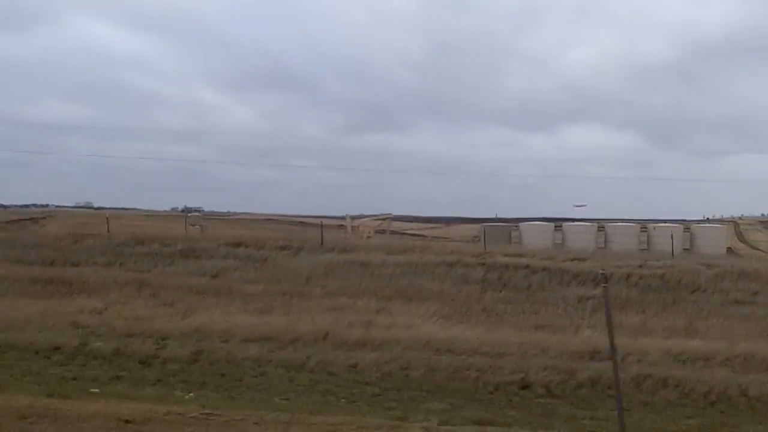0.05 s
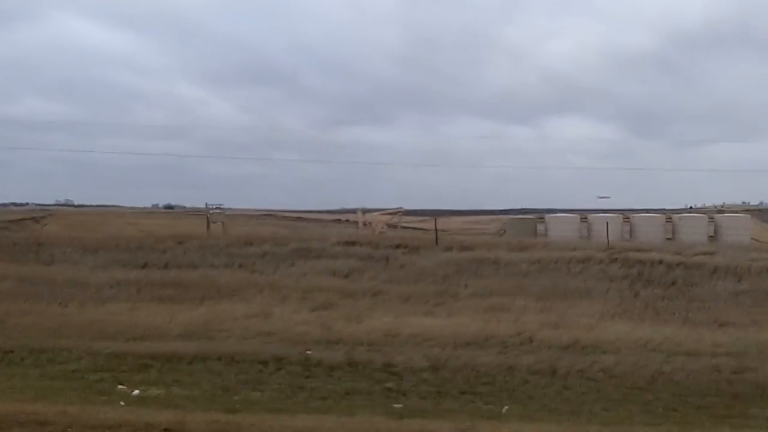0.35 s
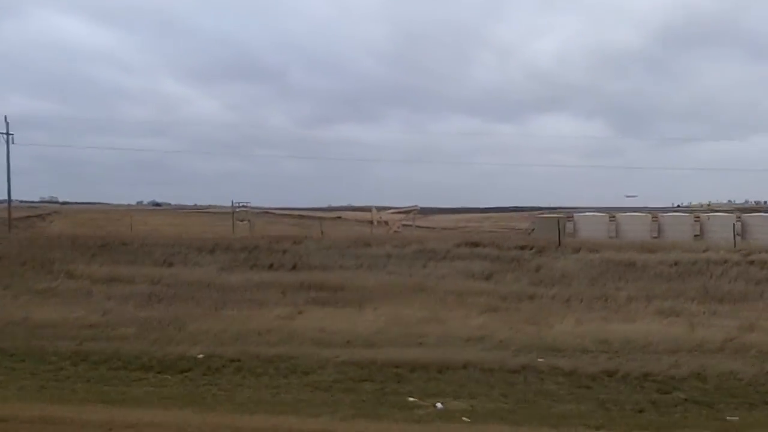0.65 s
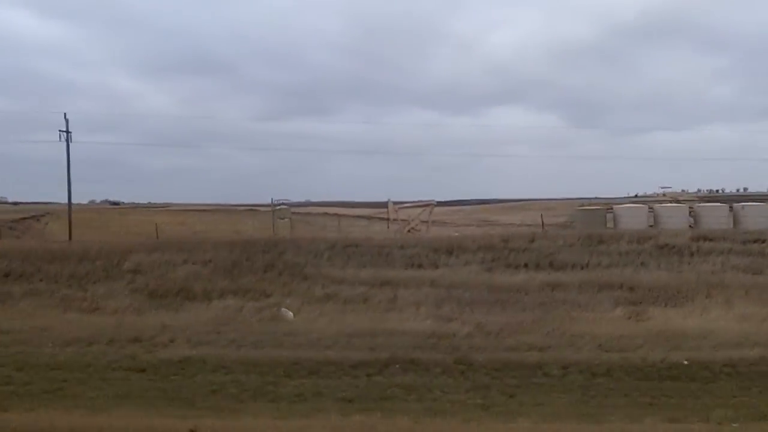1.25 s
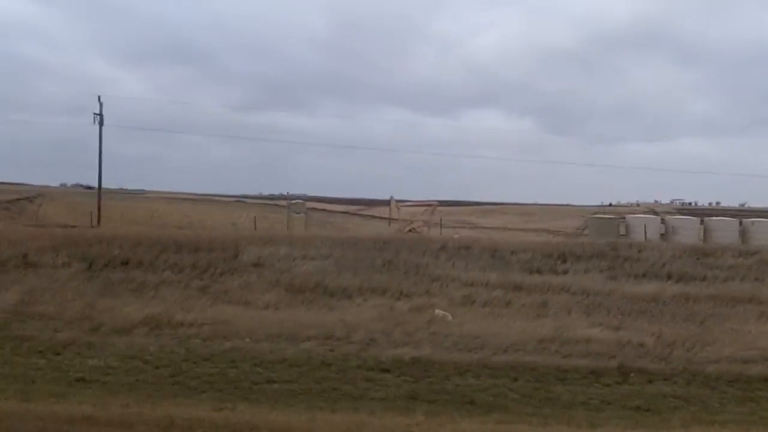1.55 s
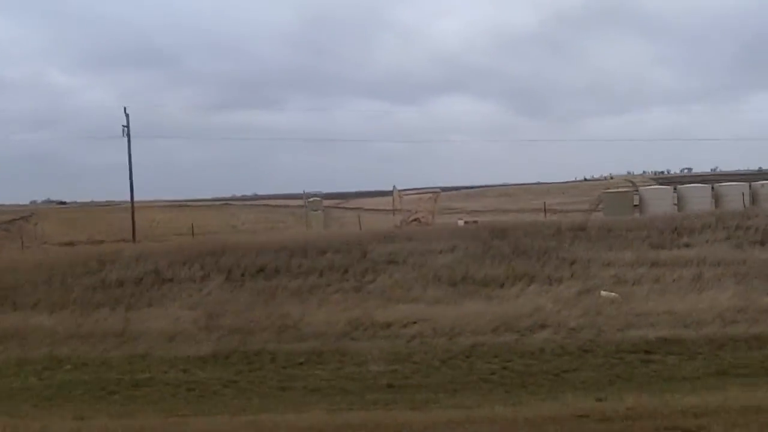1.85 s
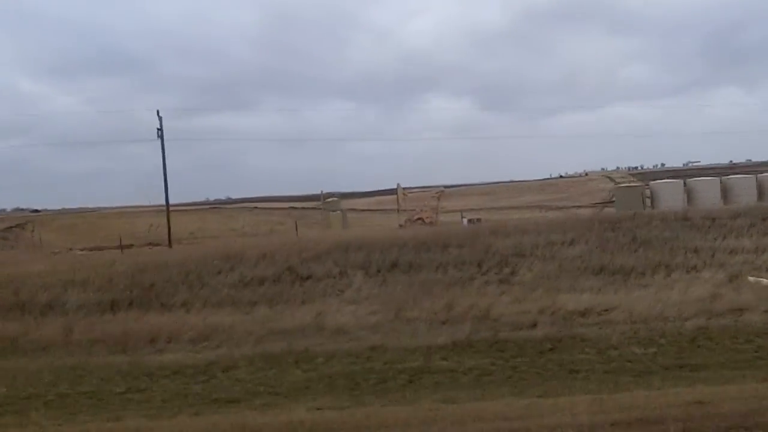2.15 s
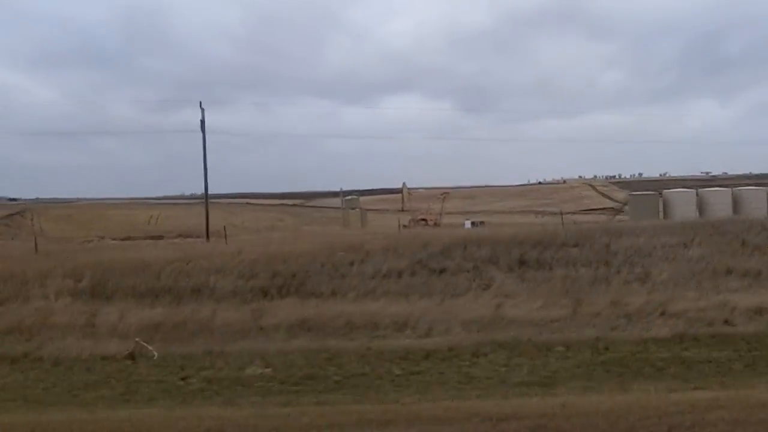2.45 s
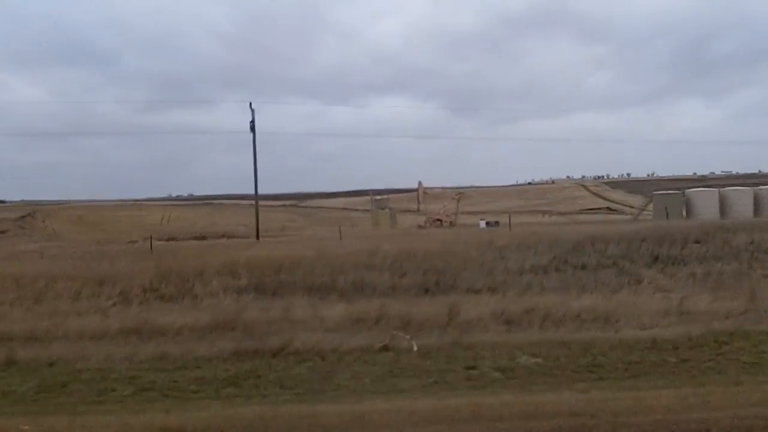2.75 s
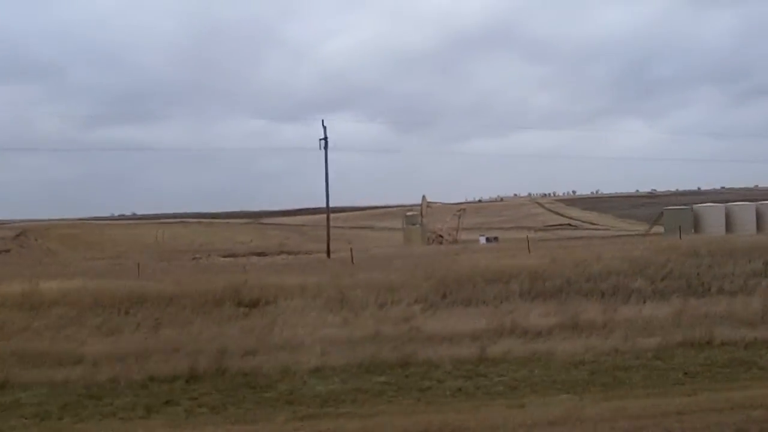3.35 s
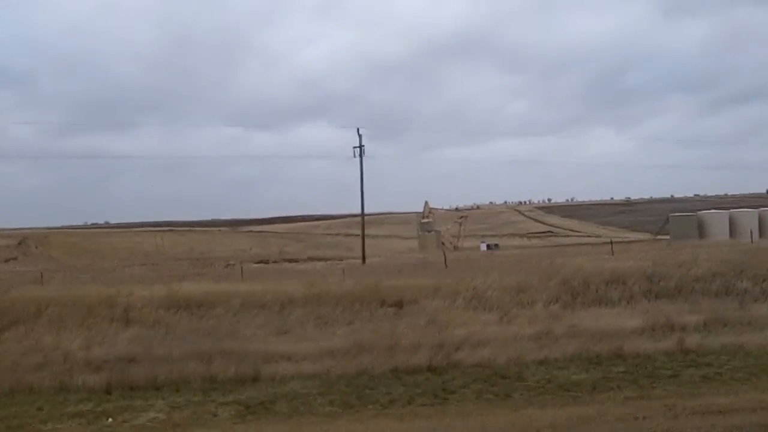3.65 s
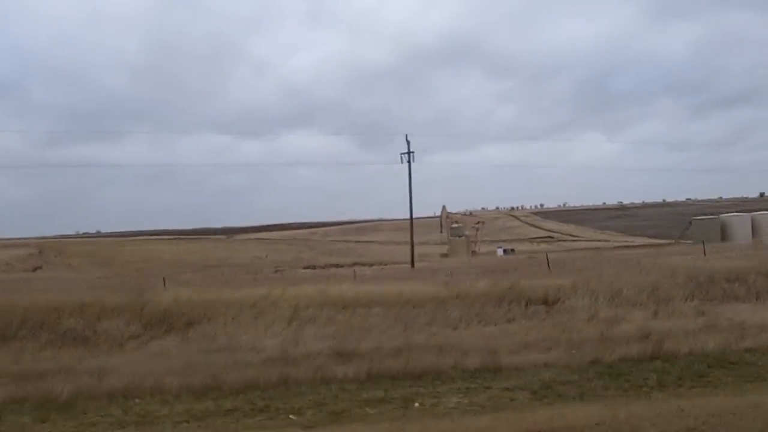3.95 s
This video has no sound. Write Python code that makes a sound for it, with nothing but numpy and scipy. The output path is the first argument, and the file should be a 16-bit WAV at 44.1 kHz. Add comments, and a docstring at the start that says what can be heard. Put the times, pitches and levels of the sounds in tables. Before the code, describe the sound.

Wind rushes and hisses in gusts on the microphone of a moving vehicle for all four seconds, over road rumble and a low engine drone. Irregular deep thumps with faint crackles hit from about 0.6 seconds, hardest just after 2 seconds, briefly ducking the sound. The hiss brightens between 1.6 and 1.9 seconds. A faint, shaky whistle comes and goes around 2.8 to 3.1 seconds.

```python
"""Open grassland, passed in a vehicle at steady speed, with wind on the microphone. The rushing air roars and
hisses in gusts and hits the microphone with low thumps; brief buzzing splutters flare around the hardest ones.
Underneath, the road rumbles and the engine drones; air briefly whistles over an edge. An automatic volume
control turns the sound down after the loudest peaks."""
import sys
import numpy as np
from scipy import signal
from scipy.fft import irfft
from scipy.io import wavfile
from scipy.ndimage import uniform_filter1d

SR = 44100
rng = np.random.default_rng(int(sys.argv[2]) if len(sys.argv) > 2 else 0)


def bounce(signal):
    """Save signal as a 16-bit WAV file at the path given by the first command-line argument."""
    frames = np.transpose(np.atleast_2d(signal))
    limited = np.clip(frames, -1, 1)
    pcm = np.round(limited * 32767).astype(np.int16)
    wavfile.write(sys.argv[1], SR, pcm)


N = 176400
TIME = np.arange(N) / SR
VOLUME_STEPS_PER_S, TREBLE_LIMIT_HZ = 750, 15500

# How strong the low wind and road noise is. Each row: time in seconds, relative level in dB.
RUMBLE_LEVELS = [(0.0, -33), (0.02, -30), (0.28, -32), (0.32, -23.5), (0.34, -29), (0.52, -28.5),
                 (0.68, -27.5), (0.71, -29), (0.81, -40.5), (0.86, -28.5), (0.885, -28.5), (0.92, -39.5),
                 (1.04, -27.5), (1.35, -31), (1.55, -33), (1.57, -28), (1.96, -28.5), (1.97, -26.5),
                 (2.09, -41), (2.16, -27.5), (2.19, -40.5), (2.34, -25), (2.46, -34), (2.9, -26.5),
                 (3.1, -29), (3.14, -24.5), (3.54, -31.5), (3.56, -33), (3.7, -28), (4.0, -28)]


def amp(db):
    """Turns decibels (dB) into a number to multiply a sound by."""
    return 10 ** (np.asarray(db) / 20)


def unit(x):
    """Scales a signal so that its average strength (rms) is one."""
    return x / np.sqrt(np.mean(x ** 2) + 1e-20)


def curves(table):
    """Joins rows of a time and its values with straight lines: one curve per value column."""
    times, *columns = np.transpose(table)
    return [np.interp(TIME, times, column) for column in columns]


def noise(colour):
    """Noise of strength one; its colour says how strong each frequency is."""
    hz, db = np.transpose(colour)
    bins = np.fft.rfftfreq(N, 1 / SR)
    gain = amp(np.interp(np.log(bins + 1), np.log(hz + 1), db))
    return unit(irfft(gain * np.exp(2j * np.pi * rng.random(len(bins))), N))


def wander(low_hz, high_hz, slope=0.35):
    """A random wobble of strength one between two rates; more slope favours the slow part."""
    bins = np.fft.rfftfreq(N, 1 / SR) + 1e-3
    gain = bins ** -slope / (1 + (low_hz / bins) ** 4) / (1 + (bins / high_hz) ** 4)
    return unit(irfft(gain * np.exp(2j * np.pi * rng.random(len(bins))), N))


def steady(x, samples):
    """Evens out the slow swells of a noise over this many samples."""
    power = uniform_filter1d(uniform_filter1d(x ** 2, samples), samples // 2)
    return x / np.sqrt(power + 1e-9)


def airstream(swirls):
    """Passing air roars and hisses, swelling with each gust and fluttering as it swirls."""
    # The gusts. Each row: time in seconds, relative roar level in dB, relative hiss level in dB.
    gusts = [(0.0, -36, -44.5), (0.07, -43.5, -51), (0.1, -36, -45), (0.17, -42.5, -48.5),
             (0.23, -42.5, -50), (0.275, -37.5, -46), (0.293, -39.5, -45), (0.308, -34.5, -42),
             (0.34, -42, -49.5), (0.38, -35.5, -45.5), (0.418, -36.5, -44), (0.45, -36.5, -46),
             (0.465, -32, -42.5), (0.48, -38, -46.5), (0.525, -36, -44.5), (0.59, -37.5, -46.5),
             (0.618, -33.5, -41.5), (0.635, -37, -46), (0.66, -43, -50), (0.71, -35.5, -46.5),
             (0.76, -44.5, -52), (0.88, -39.5, -48), (0.93, -48.5, -58), (1.02, -39, -48),
             (1.075, -34, -43.5), (1.13, -39, -48), (1.21, -37.5, -46), (1.22, -45, -50.5),
             (1.27, -40, -47), (1.4, -40.5, -48), (1.41, -36, -44.5), (1.47, -44, -49), (1.49, -37.5, -45),
             (1.55, -42, -48), (1.69, -38, -43.5), (1.728, -35, -40), (1.78, -40.5, -46),
             (1.89, -37.5, -43.5), (2.09, -46, -56), (2.16, -39, -47.5), (2.19, -49.5, -58.5),
             (2.32, -35, -46), (2.37, -36.5, -42.5), (2.39, -36, -46), (2.47, -42.5, -49.5),
             (2.51, -35, -46), (2.52, -43, -49), (2.55, -39.5, -49.5), (2.66, -41, -49.5),
             (2.73, -35.5, -46.5), (2.75, -39.5, -52), (2.77, -38.5, -47.5), (2.91, -36.5, -44.5),
             (2.97, -39, -48), (3.02, -35, -46.5), (3.05, -44, -54.5), (3.11, -37.5, -46.5),
             (3.26, -34, -46), (3.29, -41, -53), (3.31, -37.5, -48.5), (3.48, -38, -48.5),
             (3.61, -42.5, -53), (3.683, -37.5, -48), (3.693, -37.5, -48.5), (3.98, -37, -47),
             (4.0, -32, -45)]
    # The bright edge of the strongest gust. Each row: time in seconds, level in dB.
    bright_levels = [(0.0, -76), (1.52, -74), (1.62, -48), (1.72, -48), (1.79, -53), (1.822, -52),
                     (1.84, -61), (1.9, -47), (1.99, -71), (4.0, -75)]
    # The colours of the three noises. Each row: frequency in Hz, relative level in dB.
    roar_colour = [(120, -17), (300, 1), (420, 2.5), (550, -0.5), (740, -1), (920, -5), (1020, -7),
                   (1140, -6.5), (1400, -8.5), (1640, -7.5), (1800, -16.5), (3000, -32), (7000, -56),
                   (14000, -82)]
    hiss_colour = [(700, -21), (1500, -1.5), (2000, 1.5), (2700, -1.5), (3400, -3.5), (4200, -10),
                   (5000, -15), (6400, -21), (7200, -27.5), (7900, -48), (8700, -30), (11000, -34),
                   (12500, -47), (15000, -68)]
    bright_colour = [(1200, -33), (2300, 6), (3400, 4), (4200, -9), (5000, -22), (7500, -50)]
    roar_db, hiss_db = curves(gusts)
    bright_db, = curves(bright_levels)
    roar = noise(roar_colour) * amp(roar_db + 1)
    hiss = noise(hiss_colour) * amp(hiss_db + 1.77)
    bright = noise(bright_colour) * amp(bright_db)
    return roar * unit(amp(0.88 * swirls)) + (hiss + bright) * unit(amp(swirls))


def road_rumble(swirls):
    """Wind and road make a low noise, which the swirling air turns lumpy."""
    # The rumble's colour. Each row: frequency in Hz, relative level in dB.
    colour = [(20, -6.5), (45, -0.5), (70, -4), (110, 2.5), (150, -6), (200, -7.5), (270, -8.5), (330, -19),
              (700, -46), (2000, -81), (8000, -110)]
    level_db, = curves(RUMBLE_LEVELS)
    lumps = noise(colour) * amp(2.18 * swirls)
    return steady(lumps, samples=8000) * amp(level_db + 0.5)


def wind_buffeting():
    """Big swirls of air push on the microphone; the hardest pushes each make one thump."""
    # Slow swings in air pressure. Each row: time in seconds, relative level in dB.
    levels = [(0.0, -20.5), (0.07, -26), (0.12, -13), (0.21, -29.5), (0.67, -22.5), (0.69, -23.5),
              (1.19, -23.5), (2.39, -24), (2.53, -24), (2.85, -25), (2.95, -21), (3.0, -27), (3.52, -19.5),
              (4.0, -26.5)]
    # Their very deep colour. Each row: frequency in Hz, relative level in dB.
    colour = [(3, -29), (10, 3.5), (18, -0.5), (32, -5), (45, -1.5), (62, -22), (120, -54), (400, -69),
              (4000, -125)]
    # The hardest blows. Each row: time of the peak in seconds, peak pressure in dB.
    thumps = [(.355, -24), (0.644, -12.5), (0.782, -13.5), (0.911, -20), (1.215, -14.5), (1.283, -15.5),
              (1.432, -15), (2.003, -16.5), (2.052, -11), (2.174, -10.5), (2.514, -14.5), (2.636, -12.5),
              (2.735, -19), (2.945, -14.5), (3.266, -14.5), (3.319, -24), (3.542, -13.5)]
    thump_width_s = 0.0069
    level_db, = curves(levels)
    swings = steady(noise(colour), samples=6000) * amp(level_db - 1.5)
    for at, db in thumps:
        push = np.exp(-((TIME - at) / thump_width_s) ** 2)
        direction = np.sign(push @ swings)  # the way the pressure already leans
        swings = swings * (1 - push) + push * amp(db) * direction
    return swings


def engine_drone():
    """The engine and drive train hum in wavering low tones, louder when the rumble is louder."""
    # The tones of the hum. Each row: pitch in Hz, typical level in dB.
    hum = [(81.4, -36), (162.8, -44.5), (183.7, -43.5), (244.2, -49)]
    speed_drift, waver_db = 0.0054, 4
    rumble_db, = curves(RUMBLE_LEVELS)
    engine_time = np.cumsum(1 + speed_drift * wander(low_hz=0.315, high_hz=2.06)) / SR
    tones = np.zeros(N)
    for hz, db in hum:
        level = amp(db + waver_db * wander(low_hz=0.49, high_hz=13.0))
        tones += level * np.sin(2 * np.pi * (hz * engine_time + rng.random()))
    return np.sqrt(2) * tones * amp(0.88 * (rumble_db - rumble_db.mean()))


def buzzing_splutter():
    """Brief, ragged crackles flare around the hardest blows, with a buzz at the volume control's step rate."""
    # The splutters. Each row: middle in seconds, length in seconds, level in dB.
    splutters = [(.342, .016, -70), (.645, .018, -61), (0.723, .014, -63), (.784, 0.012, -58),
                 (0.91, .016, -60), (1.196, .014, -67), (1.217, 0.0082, -58), (1.28, .014, -66),
                 (1.293, .006, -60), (1.432, 0.016, -61), (1.99, .005, -63), (2.004, 0.0064, -62),
                 (2.051, .016, -60), (2.083, .04, -72), (2.14, 0.027, -71), (2.174, .018, -55.5),
                 (2.513, .011, -60), (2.552, .016, -66), (2.603, .018, -63), (2.637, 0.008, -60),
                 (2.736, .016, -62), (3.045, .012, -64), (3.268, .014, -60), (3.32, .01, -59),
                 (3.516, 0.0045, -59), (3.544, .014, -55)]
    # Their sharp colour. Each row: frequency in Hz, relative level in dB.
    colour = [(1500, -12), (4000, 8), (6500, 6.5), (8000, -5), (10000, 3.5), (13500, 1), (16000, -18)]
    rough_db, buzz_share = 4, 0.73
    bursts = sum(amp(db) * np.exp(-(2 * (TIME - at) / length) ** 2) for at, length, db in splutters)
    ragged = unit(amp(rough_db * wander(low_hz=150, high_hz=900, slope=0)))
    colour_hz, colour_db = np.transpose(colour)
    buzz = np.zeros(N)
    for hz in np.arange(VOLUME_STEPS_PER_S, TREBLE_LIMIT_HZ, VOLUME_STEPS_PER_S):
        level = amp(np.interp(hz, colour_hz, colour_db))
        buzz += level * np.cos(2 * np.pi * (hz * TIME + rng.random()))
    crackle = np.sqrt(1 - buzz_share) * noise(colour) + np.sqrt(buzz_share) * unit(buzz)
    return crackle * ragged * bursts


def wind_whistle():
    """Air crossing an edge makes a thin, shaky tone that starts quickly, slides and fades."""
    # Each row: start in seconds, length in seconds, middle pitch in Hz, slide in Hz per second,
    # starting level in dB.
    whistles = [(2.762, 0.075, 3330, -1200, -45), (2.818, 0.12, 3130, -600, -50),
                (3.006, 0.059, 3240, 1795, -49)]
    rise_s, fade_s = 0.0055, 0.0098
    shake_hz, flutter_db, sag_db = 55, 5, 10
    shake = shake_hz * wander(low_hz=16, high_hz=200)
    tones = np.zeros(N)
    for start, length, hz, slide, db in whistles:
        age = np.clip(TIME - start, 0, length)
        cycles = np.cumsum(hz + slide * (age - length / 2) + shake) / SR
        swell = np.minimum(age / rise_s, 1) * np.minimum((length - age) / fade_s, 1)
        level = amp(db - sag_db * age / length) * swell
        tones += level * np.sqrt(2) * np.sin(2 * np.pi * cycles)
    return tones * unit(amp(flutter_db * wander(low_hz=20, high_hz=150)))


def scene():
    """Adds up all the sounds at one microphone; the same swirls shake airstream and rumble."""
    swirls = wander(low_hz=7.9, high_hz=110, slope=1)
    ride = airstream(swirls) + road_rumble(swirls) + wind_buffeting() + engine_drone()
    return (ride + wind_whistle() + buzzing_splutter())[None]


def record(dry):
    """Turns the volume down in small steps after loud peaks, then cuts the highest treble."""
    threshold_db, squeeze = -24, 0.35  # squeeze: dB turned down for each dB too loud
    smooth_s, attack_s, recover_db_per_s = 0.0056, 0.007, 144
    step = (TIME * VOLUME_STEPS_PER_S).astype(int)
    memory = np.exp(-1 / (smooth_s * SR))
    level = signal.lfilter([1 - memory], [1, -memory], abs(dry[0]))
    step_level = level[np.unique(step, return_index=True)[1]]  # read once per step
    over_db = np.maximum(20 * np.log10(step_level + 1e-9) - threshold_db, 0)
    recovery_db = recover_db_per_s * np.arange(len(step_level)) / VOLUME_STEPS_PER_S
    held_db = np.maximum.accumulate(over_db + recovery_db) - recovery_db  # each peak sinks steadily
    lag = np.exp(-1 / (attack_s * VOLUME_STEPS_PER_S))
    eased_db = signal.lfilter([1 - lag], [1, -lag], held_db)
    volume = uniform_filter1d(amp(-squeeze * eased_db)[step], size=7)
    treble_cut = signal.firwin(511, TREBLE_LIMIT_HZ, window=("kaiser", 9), fs=SR)
    return signal.oaconvolve(dry * volume, treble_cut[None], "same")


dry = scene()
out = record(dry)
bounce(out)
```